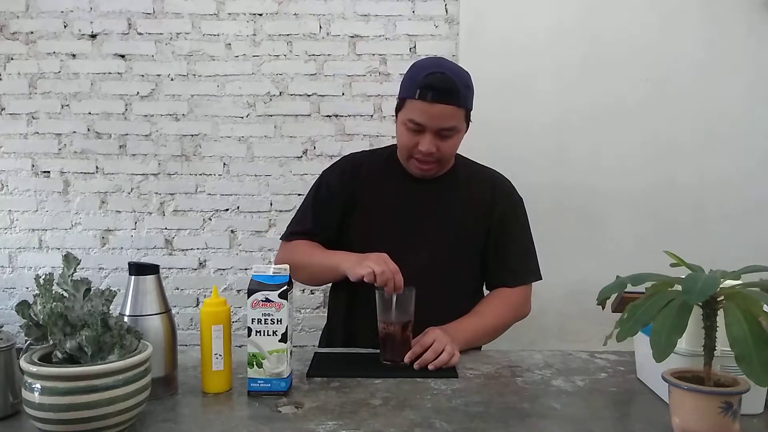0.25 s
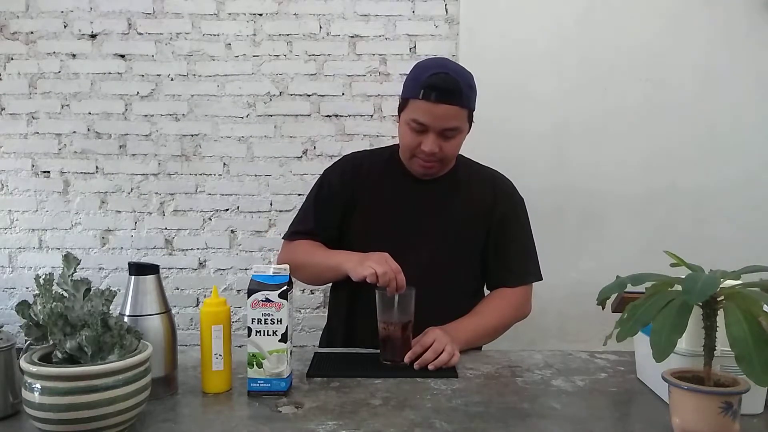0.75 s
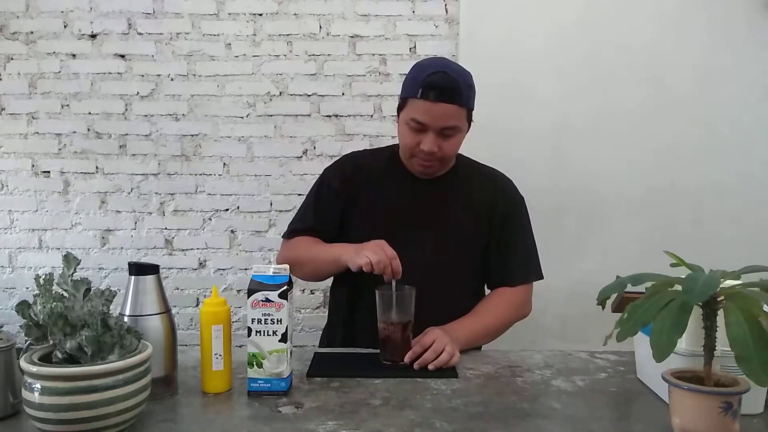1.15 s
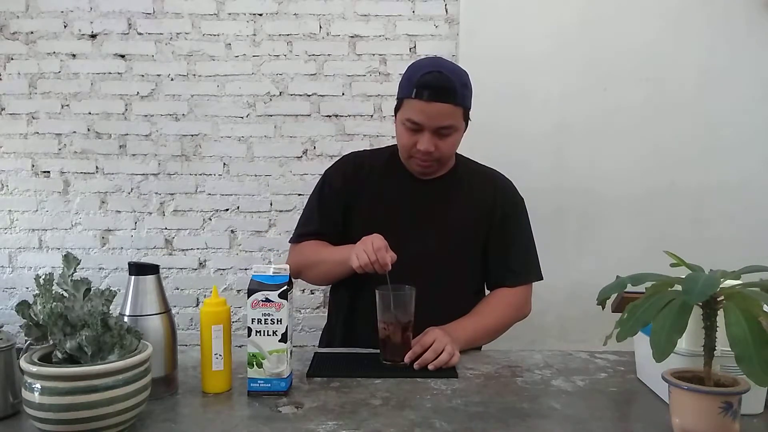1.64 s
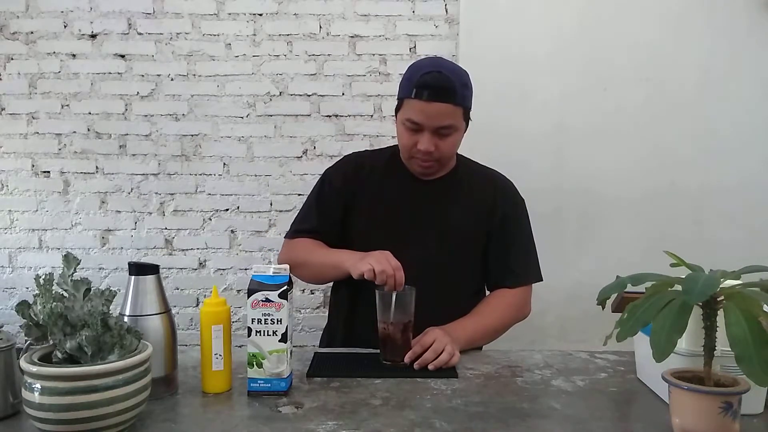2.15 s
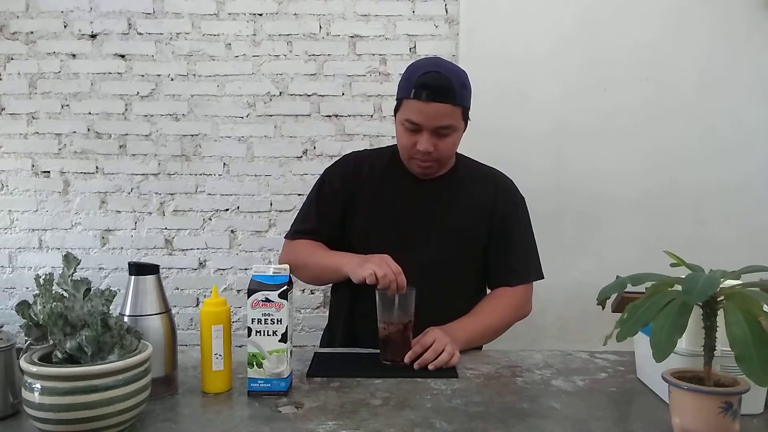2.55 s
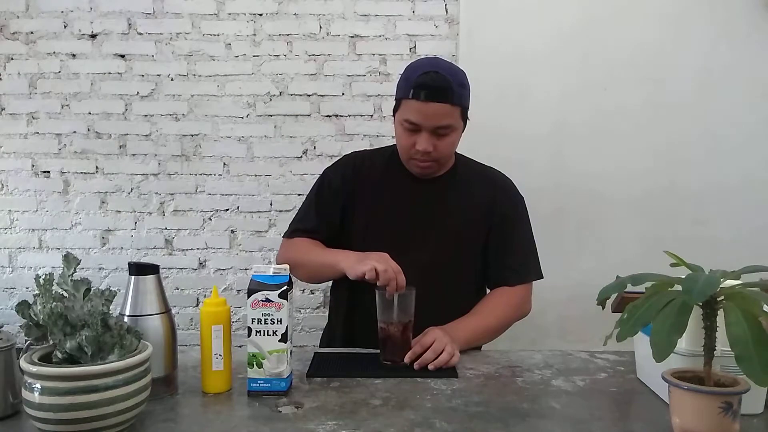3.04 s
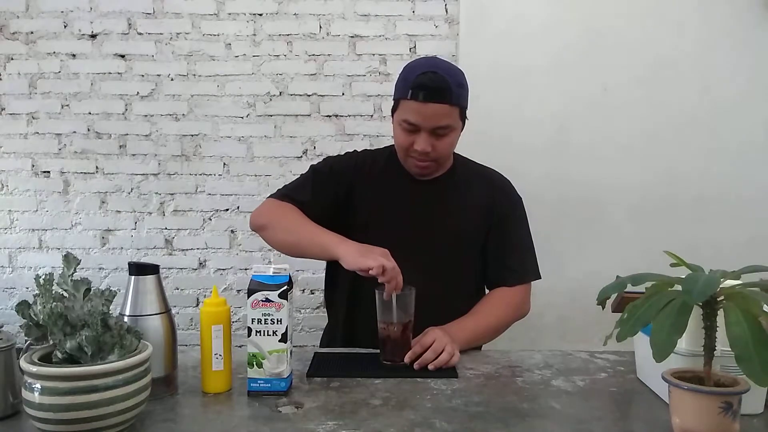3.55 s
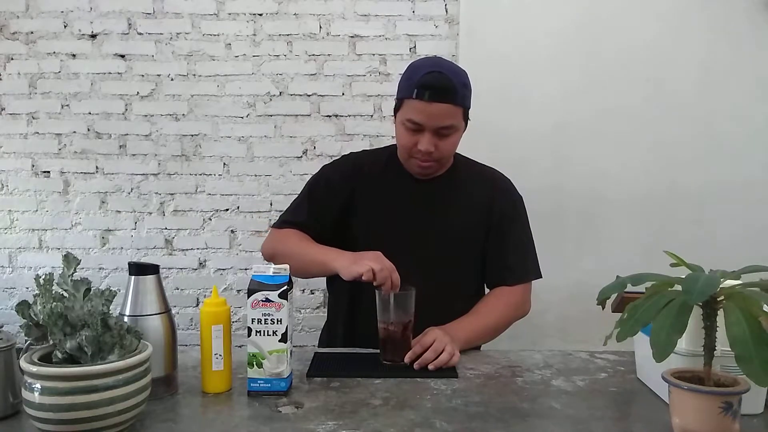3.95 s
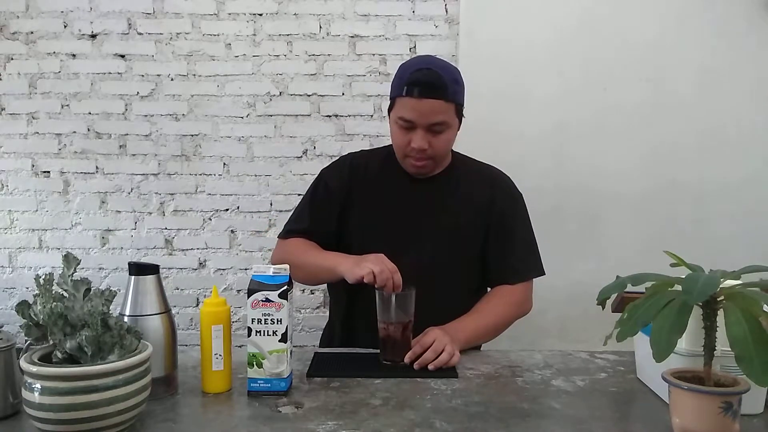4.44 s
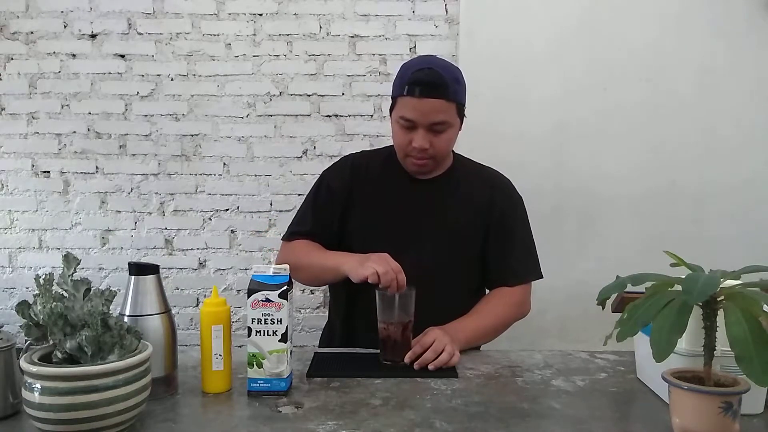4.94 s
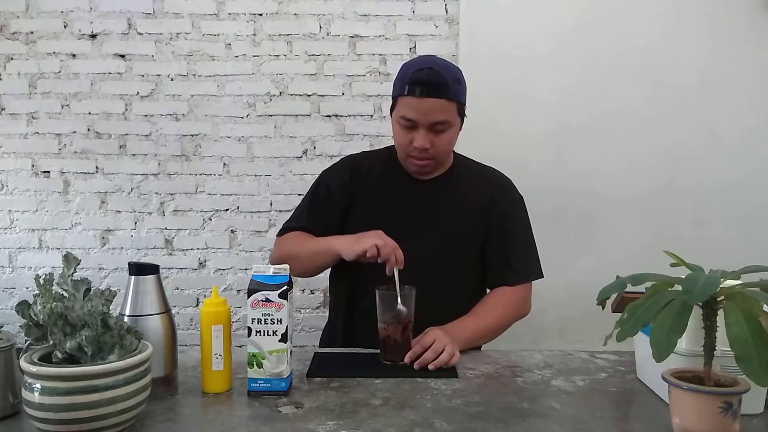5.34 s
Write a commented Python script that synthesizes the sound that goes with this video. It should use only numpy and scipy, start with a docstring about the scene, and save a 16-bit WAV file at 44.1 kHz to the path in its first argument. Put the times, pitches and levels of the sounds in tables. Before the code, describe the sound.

Stirring a drink: bright, briefly ringing spoon taps on a tall glass, pausing and resuming, over low flickering rumble and faint hiss.

```python
"""A long metal spoon clinks on the wall of a tall glass: damped wall modes ring and a broad metallic crack sounds.
Its bowl knocks dully under the drink and excites the air column; bubbles glug as short rising sines;
the shaft scrapes the rim as narrow noise. Noise tails give the answer of the hard walls of a kitchen.
Behind lie flickering low noise with dropouts, hiss, soft bumps and a droning tone that swells and drops out.
A stereo recorder a couple of metres away suppresses weak bands and cuts the top."""
import sys
import numpy as np
from scipy import signal
from scipy.fft import rfft, irfft
from scipy.io import wavfile
from scipy.ndimage import uniform_filter1d

SR = 44100
rng = np.random.default_rng(int(sys.argv[2]) if len(sys.argv) > 2 else 0)


def transcribe(u):
    """Save the signal u as a 16-bit wav file named by the first command-line argument.

    u: samples, shape (n,) or (channels, n), limited to [-1, 1]; the rate is SR.
    q: integer samples, one column per channel.
    """
    v = np.clip(np.atleast_2d(u).T, -1, 1)
    q = np.round(v * 32767).astype(np.int16)
    wavfile.write(sys.argv[1], SR, q)


N = 246519
BLOW_SAMPLES = 2 ** 14
TIME = np.arange(BLOW_SAMPLES) / SR
FREQ = np.arange(BLOW_SAMPLES // 2 + 1) * SR / BLOW_SAMPLES

# In the resonance tables the width is that of one band-pass section, before any cascading.
# Shaft on the wall. Each row: start in seconds, crack level in dB before the spoon gain, then in dB relative
# to the crack: base, oval mode, first and second family of three-lobed modes, clatter of the spoon;
# last, second minus first twin in dB.
CLINK_BLOWS = [(0.0024, -39.5, -9, -2.5, 0.5, -6, 0.5, 17), (0.0864, -38, 1.5, 12.5, 5, -16, 6, -14),
               (0.3516, -33.5, 0.5, 8, -9, -11, -3.5, -38), (0.4224, -41, 2, 7, 4.5, -17, 1, -1),
               (0.5756, -35.5, 1, 9.5, -4, -6, -3, -21), (0.6514, -47.5, 8, -13, 10, -8, 13.5, -15),
               (0.7988, -28.5, -3.5, 10.5, -7.5, -8.5, 1, 1.5), (0.8724, -41, 7.5, 1, 4, -16, 4, 2),
               (1.019, -24.5, -7.5, 5.5, -3, -5, -9, 3.5), (1.1518, -32.5, 1, 1.5, 5, -11, 3.5, -5),
               (1.5838, -36, -23, 17.5, -5.5, 12.5, -16, -7), (1.6077, -32, -24, 8, -20, 8, -26, -27),
               (2.0404, -58.5, -11, 8, -12, -4, -3, -9), (2.1131, -66.5, -4, -7, -5.5, 4, 0, -4),
               (2.2518, -60.5, 4, 17.5, -21, -23, -13, 11), (2.3635, -55, -0.5, -17.5, -18, -6, 0, -20),
               (2.6307, -26, -7.5, -3.5, 7, 2.5, 4, -1), (2.7134, -47.5, -21, 11, 6, 3, 6, -21),
               (2.9012, -27.5, -4, 2.5, 11.5, 6, 5.5, 3.5), (3.1537, -30.5, -1, 8, 5, -6.5, 0, -4),
               (3.2234, -43.5, 3.5, -2, 16, 4.5, 14, 1.5), (3.781, -62, 17.5, -20.5, -9, -18, -8.5, -12),
               (3.8015, -63, 6, -18, 14, 14, 2, -2), (3.9687, -52.5, -6, 13, 5.5, -17, 11.5, -3),
               (4.0657, -49, 15, 10.5, -6, -9, -4, 2), (4.2428, -36.5, -6, 12, 4.5, -10, 2.5, -29),
               (4.3036, -34, -0.5, -1, 4, -24, -7, -22), (4.5021, -27, 0.5, 8.5, 2, -8.5, -1, -3.5),
               (4.5794, -41, -16, -2, 5.5, -15, 5, -21), (4.7344, -28.5, 3.5, 7, 1, -10, -2, -14),
               (4.8114, -43, 9.5, 3.5, 10.5, -3, 10, -23), (4.975, -27.5, -6, 4, -2.5, -10, -2.5, -29),
               (5.0354, -42, 7.5, 10.5, 12, 2.5, 6.5, -2), (5.226, -27.5, -4.5, 9.5, -1, -1, -1, -1),
               (5.2464, -40, 4, 1, 12.5, 0, 6, -8)]
# Glass wall and spoon shaft. Each row: frequency in Hz before detuning, relative level in dB,
# 60 dB decay time in seconds, phase lead of the left in radians.
GLASS_MODES = [(1086, -2, 0.028, 0.27), (1505, -9, 0.065, 1.35), (1804, 10, 0.013, 1.1),
               (2143, -1, 0.2, 2.26), (2152, -3, 0.11, 2.86), (3870, -2, 0.092, 0.53),
               (4280, -7.5, 0.11, 1.6), (4910, -6.5, 0.058, 2.2), (4854, 5, 0.05, 2.66),
               (5027, 3.5, 0.18, 1.87), (4995, -2, 0.25, 3.7), (5330, -2, .03, 1.7), (5540, -1.5, .03, 1.5),
               (5750, -2.5, .035, 1.3), (6170, -19, 0.15, 0.55), (8895, -2, 0.035, 0.72),
               (8940, -6, .07, 1.9), (8750, -47, 0.0525, 1.1), (10745, 1.5, 0.018, 1),
               (11520, -6.5, 0.03, 0.7), (13800, -30, 0.071, 1.5), (14800, -38.5, 0.067, 1.5)]
# Family of each glass mode: 0 base, 1 oval, 2 shaft, 3 first three-lobed, 4 second three-lobed, 5 bowl, 6 high.
GLASS_FAMILY = [0, 0, 0, 1, 1, 2, 2, 3, 3, 4, 4, 5, 5, 5, 6, 6, 6, 6, 6, 6, 6, 6]
# Side of each glass mode in a split pair: -1 first twin, 1 second twin, 0 not split;
# in the 5 kHz pair the first is the higher.
TWIN_SIDE = [0, 0, 0, -1, 1, 0, 0, 0, 0, -1, 1, 0, 0, 0, 0, -1, 1, 0, 0, 0, 0, 0]
# Crack of steel on glass, heavily damped spoon modes. Each row: frequency in Hz, width in Hz, relative level in dB.
CRACK_MODES = [(1810, 170, -3.5), (2957, 460, 2), (3396, 780, 4.5), (4260, 980, -3), (4705, 780, -1),
               (5724, 1130, 0), (7950, 2020, -6.5), (11500, 980, -12.5), (13940, 1400, -30)]
# Family that colours each crack mode, numbered as above; 7 follows the crack alone.
CRACK_MODE_FAMILY = [0, 7, 7, 2, 3, 5, 6, 6, 6]
# First contact of steel and glass. Each row: frequency in Hz, width in Hz, level in dB relative to the crack level.
CONTACT_TICK = [(13000, 9000, 5)]
# Mean offsets of spoon shaft, spoon bowl and high modes, in dB.
CLATTER_OFFSET_DB = [-10.5, -3.5, -4]
# How far shaft, bowl and high modes follow the clatter, in dB per dB.
CLATTER_SLOPE = [0.94, 1.1, 0.39]
# Bowl of the spoon under the drink. Each row: start in seconds, level in dB before a common trim.
KNOCK_BLOWS = [(0.003, -28.5), (0.088, -22.5), (0.185, -20), (0.297, -30), (0.351, -27), (0.423, -16.5),
               (0.575, -29.5), (0.652, -17), (0.803, -20.5), (0.873, -18), (1.02, -22.5), (1.059, -20.5),
               (1.153, -27.5), (2.254, -48), (2.371, -30.5), (2.714, -31), (2.901, -36), (2.959, -31.5),
               (3.06, -29), (3.155, -23), (3.224, -20), (3.969, -32), (4.015, -52), (4.065, -32),
               (4.078, -34.5), (4.243, -23.5), (4.304, -22), (4.327, -26), (4.58, -20), (4.739, -26.5),
               (4.812, -15.5), (4.975, -22), (5.036, -17.5), (5.225, -23.5), (5.316, -30.5)]
# Air column over the drink and damped base. Each row: frequency in Hz, width in Hz, relative level in dB.
COLUMN_MODES = [(702.4, 38.7, 3), (766, 77, -12), (644.7, 83.8, -4.5), (711.3, 276, -8), (583.4, 175, -18),
                (1230, 453, -11)]
# Air pockets folded into the drink. Each row: start in seconds, level in dB, initial frequency in Hz.
BUBBLES = [(0.199, -32.5, 509), (0.243, -32.5, 551), (0.299, -26.5, 573), (0.349, -25, 558.5),
           (0.389, -29, 596), (0.44, -34.5, 377), (0.872, -32, 489), (1.076, -30, 531), (4.065, -26, 640),
           (5.03, -23, 613.3)]
# Shaft on the rim. Each row: time in seconds, level in dB before a common gain.
SCRAPE_LEVEL = [(3.88, -85), (3.898, -70), (3.99, -69), (4.06, -67), (4.082, -51.5), (4.228, -65),
                (4.235, -54)]
# Soft low bumps. Each row: centre in seconds, frequency in Hz, level in dB.
LOW_BUMPS = [(0.219, 223, -38), (0.44, 244, -41.5), (0.65, 220, -33.5), (0.829, 313, -41.5),
             (0.91, 314, -44.5), (1.0, 260, -43.5), (1.169, 190, -34), (1.321, 318, -44), (1.631, 320, -43),
             (1.802, 326, -46.5), (2.12, 334, -50.5), (2.27, 239, -38), (2.351, 245, -40),
             (2.821, 308, -49), (3.274, 320, -41), (3.73, 314, -47.5), (4.31, 345, -52), (4.74, 316.5, -48),
             (5.199, 325, -41.5)]
# Course of the background. Each row: time in seconds, deep and middle rumble level in dB before a common gain.
RUMBLE_LEVELS = [(0.0, -41, -53), (0.68, -40, -48), (0.82, -49, -58.5), (1.3, -46, -51.5),
                 (1.8, -52.5, -56.5), (2.12, -50.5, -57), (2.3, -42.5, -47.5), (2.52, -50, -63.5),
                 (2.7, -52.5, -66.5), (3.0, -52, -60.5), (3.12, -33, -65), (3.25, -43.5, -60),
                 (3.4, -52, -61.5), (3.58, -69, -80.5), (3.78, -41, -63), (4.4, -48.5, -56.5),
                 (4.55, -36, -43.5), (5.59, -38.5, -42.5)]
# Low room modes, deep, middle and upper. Each row: frequency in Hz, width in Hz, relative level in dB.
DEEP_MODES = [(72.7, 14.3, -4.5), (101.1, 7.1, 3.3), (130.4, 22.8, -4.5)]
RUMBLE_MODES = [(173, 30, 5.5), (214, 49, -4.5), (229.5, 68, 0.5)]
UPPER_MODES = [(320.4, 32, -3.7), (385, 120, -12)]
# Colour of the hiss. Each row: frequency in Hz, relative level in dB per Hz.
HISS_COLOUR = [(150, -13.5), (300, -16), (500, -10.5), (1640, -14), (4370, -20), (9000, -31.5),
               (16000, -41.5)]
# Background dropouts. Each row: middle in seconds, length in seconds, depth in dB for the rumble bands.
LEVEL_DROPS = [(1.376, 0.045, -35), (2.0, .14, -23), (2.583, 0.1, -24), (3.493, 0.13, -30),
               (3.65, 0.074, -23.5), (4.44, 0.065, -20)]
# Droning tone. Each row: time in seconds, frequency in Hz, level in dB before the stereo gains and end fades.
DRONE_COURSE = [(4.55, 139.8, -49), (4.584, 140, -66), (4.608, 138.9, -43), (4.666, 133.6, -29.5),
                (4.792, 128.4, -43), (4.908, 129.1, -30.5), (5.192, 128.2, -26), (5.5, 131.7, -47.5)]
# Noise suppressor. Each row: frequency in Hz, level in dB per bin below which sound is pushed down.
SUPPRESSOR_THRESHOLD = [(300, -110), (600, -72), (2000, -72), (5000, -75), (9000, -94), (16000, -113)]

ROOM_T60_LOW_S, ROOM_T60_HIGH_S, ROOM_TURN_HZ = 0.34, 0.33, 6070
# Positive pan: left louder than right by this much.
CLINK_PAN_DB, KNOCK_PAN_DB, PAN_SCATTER_DB, CLATTER_SCATTER_DB = -1.5, 2, 3.52, 1.5
RISE_S = 0.0013  # the wall takes a moment to ring up
FAR_WALL_S = 0.04  # round trip
BUMP_S, BUMP_WIDTH_HZ = 0.036, 50
UPPER_DB, HISS_DB, HISS_DROP_SHARE = -63.5, -56.5, 0.15
FLICKER_DB, FLICKER_PER_S = 2.5, 12
TOP_HZ = 16000


def clinks(follow=0.71):
    """Modal impact: wall modes, whose lobes reach the microphones out of step, ring as the spoon cracks."""
    out = np.zeros((2, N + BLOW_SAMPLES))
    # Each column stands on its own axis: microphone, mode, frequency.
    hz, db, t60, lead = np.transpose(GLASS_MODES)[:, :, None]
    crack_parts = np.array([resonances([mode], FREQ, order=2) * (-1) ** k
                            for k, mode in enumerate(CRACK_MODES)])
    delay = np.exp(-2j * np.pi * FREQ / SR)  # one sample

    def ring(pole, start):
        """Two-pole resonator: the spectrum of a decaying sine with a given starting phase."""
        numerator = np.sin(start) + np.imag(pole * np.exp(-1j * start)) * delay
        return numerator / (1 - 2 * np.real(pole) * delay + np.abs(pole) ** 2 * delay ** 2)

    for s, crack_db, base, oval_db, first_db, second_db, clatter_db, twin_db in CLINK_BLOWS:
        scatter_db = CLATTER_SCATTER_DB * rng.standard_normal(len(CLATTER_OFFSET_DB))
        shaft, bowl, high = clatter_db * np.array(CLATTER_SLOPE) + CLATTER_OFFSET_DB + scatter_db
        family_db = [base, oval_db, shaft, first_db, second_db, bowl, high]
        pan_db = CLINK_PAN_DB + PAN_SCATTER_DB * rng.standard_normal()

        # Where on the rim the blow lands decides which twin of a split mode speaks.
        share = 1 / (1 + undb(-2 * twin_db * np.array(TWIN_SIDE)[:, None]))
        size = np.sqrt(2 * share) * undb(db + np.array(family_db)[GLASS_FAMILY, None])
        # The swirling drink detunes the wall a little from blow to blow.
        detune = 1 + 0.0006 * rng.standard_normal(hz.shape)
        pole = np.exp((2j * np.pi * hz * detune - np.log(1000) / t60) / SR)
        start = 2 * np.pi * rng.random(hz.shape) + np.array([lead, -lead]) / 2
        # A faster-dying copy is subtracted so that each mode grows gradually.
        fast_pole = pole * np.exp(-1 / (RISE_S * SR))
        wall = np.sum(size * (ring(pole, start) - ring(fast_pole, start)), axis=1)

        body = undb(follow * np.append(family_db, 0)[CRACK_MODE_FAMILY]) @ crack_parts
        chatter = rng.standard_normal((2, BLOW_SAMPLES)) * np.exp(-TIME / 0.0052)
        tail = room()
        spoon = undb(10.0) * rfft(chatter) * body * (1 + undb(4.5) * tail)
        tick = undb(follow * high) * resonances(CONTACT_TICK, FREQ, order=2)
        blow = tick + spoon + wall * (1 + undb(1.74) * tail)
        add(out, s, undb(crack_db) * blow, pan_db)
    return out[:, :N]


def knocks(push_s=0.00045):
    """Forced resonance: a soft push under the liquid rings the air column; a far wall returns its main tone."""
    out = np.zeros((2, N + BLOW_SAMPLES))
    push = np.exp(-((TIME - 3 * push_s) / push_s) ** 2)
    body = resonances(COLUMN_MODES, FREQ, order=2) * rfft(push)
    body = body / np.abs(irfft(body)).max()
    # The wall returns one band: frequency in Hz, width in Hz, gain in dB.
    echo = resonances([(704.3, 37.5, 0.5)], FREQ) * np.exp(-2j * np.pi * FREQ * FAR_WALL_S)
    for s, db in KNOCK_BLOWS:
        heard = body * (1 + echo + undb(3.5) * room(alike_hz=787.0))
        pan_db = KNOCK_PAN_DB + PAN_SCATTER_DB * rng.standard_normal()
        add(out, s, undb(db - 2.33) * heard, pan_db)
    return out[:, :N]


def glugs(cycles=8.5, glide_per_s=1.31):
    """Bubble resonance: damped sines rise in pitch as the bubbles near the surface."""
    out = np.zeros((2, N + BLOW_SAMPLES))
    for s, db, hz in BUBBLES:
        tone = np.sin(2 * np.pi * hz * TIME * (1 + glide_per_s * TIME))
        decay = np.exp(-TIME * hz / cycles)
        bubble = tone * decay * np.minimum(TIME / 0.002, 1)
        add(out, s, undb(db) * rfft(bubble) * (1 + undb(-0.5) * room()), 0)
    return out[:, :N]


def scrape():
    """Friction-excited resonance: the shaft slides along the rim and sings faintly as narrow-band noise."""
    f, t = np.arange(N // 2 + 1) * SR / N, np.arange(N) / SR
    contact = (t > SCRAPE_LEVEL[0][0]) * (t < SCRAPE_LEVEL[-1][0])
    touching = uniform_filter1d(1. * contact, size=400)
    singing = pair(resonances([(4150, 350, 0)], f, order=2), likeness=0.39, lead=0.98)
    return touching * undb(curve(SCRAPE_LEVEL)[0] + 2.5) * singing


def bumps(lead=1.47):
    """Resonant filtering of noise: each bump is a soft puff in one low band, the left leading by an angle."""
    out = np.zeros((2, N + BLOW_SAMPLES))
    for s, hz, db in LOW_BUMPS:
        band = resonances([(hz, BUMP_WIDTH_HZ, 0)], FREQ, order=2)
        tone = unit(irfft(rfft(rng.standard_normal(BLOW_SAMPLES)) * band))
        puff = rfft(tone * np.exp(-((TIME - 0.1) / BUMP_S) ** 2))
        add(out, s - 0.1, undb(db) * np.array([puff, puff * np.exp(-1j * lead)]), 0)
    return out[:, :N]


def drone():
    """Frequency modulation: a low sine, as of a motor outside, wanders in pitch and is stronger on the right."""
    hz, db = curve(DRONE_COURSE)
    rise = np.interp(np.arange(N) / SR, [4.5, 4.58, 5.45, 5.55], [0, 1, 1, 0])
    phase = 2 * np.pi * np.cumsum(hz) / SR
    left = undb(-4.5) * np.sin(phase + 0.15)
    right = undb(1.0) * np.sin(phase)
    return np.sqrt(2) * rise * undb(db) * np.array([left, right])


def behind():
    """Room-mode filtering of noise: rumble bands flicker singly and drop together; a faint hiss drops less."""
    f, t = np.arange(N // 2 + 1) * SR / N, np.arange(N) / SR
    deep_db, rumble_db = curve(RUMBLE_LEVELS)
    drop_db = sum(db * np.exp(-(2 * (t - s) / length) ** 4) for s, length, db in LEVEL_DROPS)

    def level(db):
        """Amplitude modulation by the common dropouts and a fresh random flicker."""
        return undb(db + drop_db + FLICKER_DB * walk(FLICKER_PER_S))

    deep = pair(resonances(DEEP_MODES, f, order=2), likeness=0.98, lead=2.26)
    rumble = pair(resonances(RUMBLE_MODES, f, order=2), likeness=0.78, lead=1.41)
    upper = pair(resonances(UPPER_MODES, f, order=2), likeness=0.34, lead=1.8)
    hiss = pair(gain_at(HISS_COLOUR, f), likeness=0.37, lead=1.06)
    low = level(deep_db + 3.0) * deep + level(rumble_db + 3.0) * rumble + level(UPPER_DB) * upper
    return low + undb(HISS_DB + HISS_DROP_SHARE * drop_db) * hiss


def room(gap_s=0.0048, alike_hz=937.0):
    """Diffuse reverberation: a decaying noise tail, new for every blow as the hands move, with bass alike in both."""
    noise = rng.standard_normal((2, BLOW_SAMPLES)) * np.clip(TIME / gap_s - 1, 0, 1)
    low, high = (rfft(noise * 1000 ** (-TIME / t60)) for t60 in (ROOM_T60_LOW_S, ROOM_T60_HIGH_S))
    share = 1 / (1 + (FREQ / ROOM_TURN_HZ) ** 2)  # the treble dies slightly sooner
    tail = (share * low + (1 - share) * high) / np.sqrt(SR * ROOM_T60_LOW_S / (2 * np.log(1000)))
    alike = 1 / (1 + (FREQ / alike_hz) ** 4)
    return np.array([tail[0], np.sqrt(alike) * tail[0] + np.sqrt(1 - alike) * tail[1]])


def add(out, s, blow, pan_db):
    """Superposition: add one sound at both microphones, with a level difference and a faded end."""
    i = int(s * SR)
    fade = np.minimum(TIME[::-1] / 0.05, 1)
    out[:, i:i + BLOW_SAMPLES] += irfft(blow) * fade * undb([[pan_db / 2], [-pan_db / 2]])


def resonances(modes, f, order=1):
    """Modal summation: band-pass resonances with alternating signs; a higher order has steeper skirts."""
    total = 0
    for k, (hz, width_hz, db) in enumerate(modes):
        band = 1j * f * width_hz / (hz ** 2 - f ** 2 + 1j * f * width_hz)
        total = total + (-1) ** k * undb(db) * band ** order
    return total


def pair(gain, likeness, lead):
    """Partial coherence: coloured noise for two microphones, partly alike, the left leading by an angle."""
    a, b = (rfft(rng.standard_normal(N)) * gain for _ in range(2))
    c = np.clip(likeness, 0, 1)
    right = c * a * np.exp(-1j * lead) + np.sqrt(1 - c ** 2) * b
    return unit(irfft(np.array([a, right]), N))


def walk(rate):
    """Random modulation: levels held 1 / rate seconds and slewed twice; spread near 1."""
    k = int(SR / rate)
    steps = np.repeat(rng.standard_normal(N // 500), k)
    return 1.33 * uniform_filter1d(uniform_filter1d(steps, k), k)[:N]


def gain_at(points, f):
    """Spectral envelope: interpolate points of Hz and dB over log frequency."""
    hz, db = np.transpose(points)
    return undb(np.interp(np.log(f + 1), np.log(hz), db))


def curve(table):
    """Time envelope: interpolate the columns of a time table at every sample."""
    s, *columns = np.transpose(table)
    return [np.interp(np.arange(N) / SR, s, c) for c in columns]


def undb(db):
    """Decibel law: amplitude ratio from level."""
    return 10 ** (np.asarray(db) / 20)


def unit(x):
    """Effective value: scale to a root mean square of 1."""
    return x / np.sqrt(np.mean(x ** 2))


def suppress(x, depth_db=-15.5, steep=0.59):
    """Spectral gating: bands whose smoothed power sinks under the threshold are pushed down."""
    f, _, z = signal.stft(x, SR, nperseg=512)
    power = np.mean(np.abs(z) ** 2, axis=0)
    power = uniform_filter1d(power, size=9, axis=0)  # over frequency
    power = uniform_filter1d(power, size=3, axis=1)  # over time
    above = (np.maximum(power, 0) / gain_at(SUPPRESSOR_THRESHOLD, f)[:, None] ** 2) ** steep
    gain = undb(depth_db) + (1 - undb(depth_db)) * above / (1 + above)
    return signal.istft(z * gain, SR, nperseg=512)[1][:, :N]


def scene():
    """Linear superposition of all sources."""
    return clinks() + knocks() + glugs() + scrape() + bumps() + drone() + behind()


def record(dry):
    """Linear filtering and gating: the microphones dip near 2.2 kHz; the recorder suppresses noise and cuts the top."""
    f = np.arange(N // 2 + 1) * SR / N
    heard = irfft(rfft(dry) * (1 - resonances([(2160, 1530, 4.29)], f)), N)
    top_cut = signal.ellip(10, .2, 80, TOP_HZ, fs=SR, output="sos")
    return signal.sosfilt(top_cut, suppress(heard))


dry = scene()
out = record(dry)
transcribe(out)
```